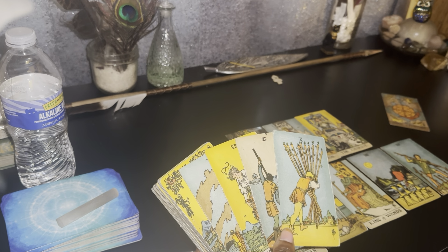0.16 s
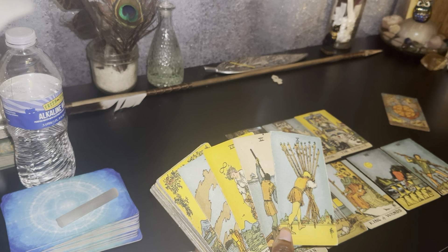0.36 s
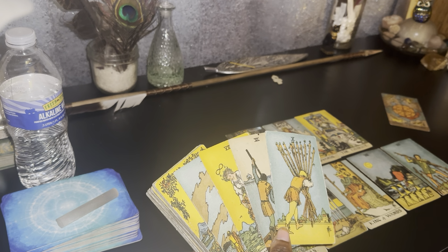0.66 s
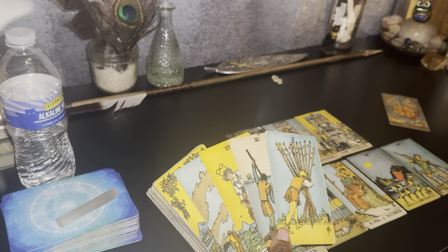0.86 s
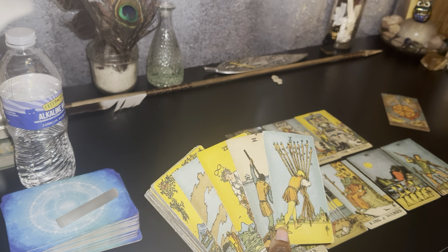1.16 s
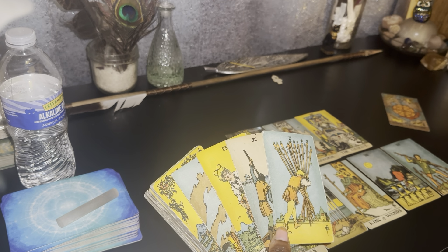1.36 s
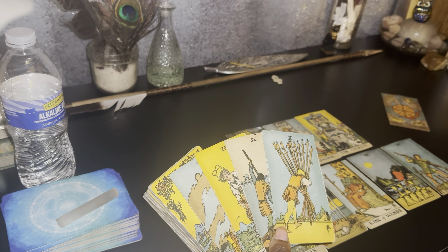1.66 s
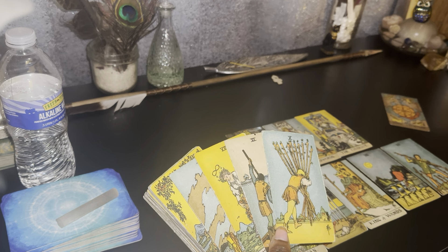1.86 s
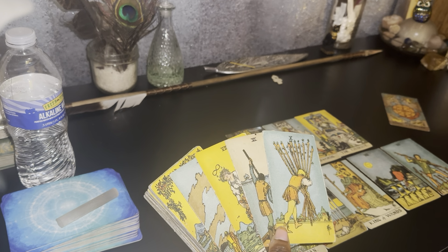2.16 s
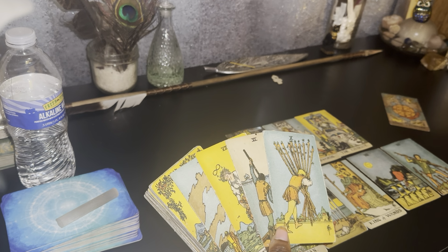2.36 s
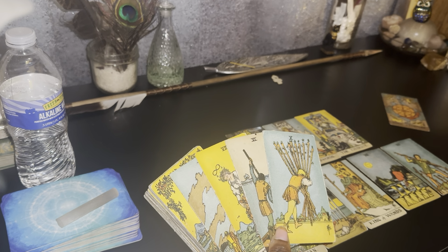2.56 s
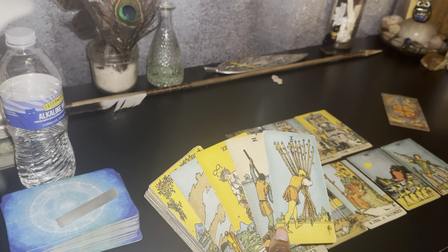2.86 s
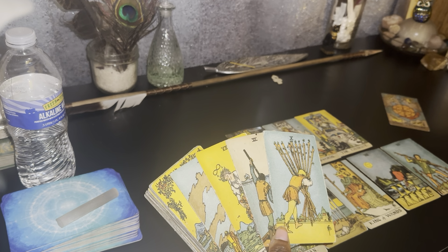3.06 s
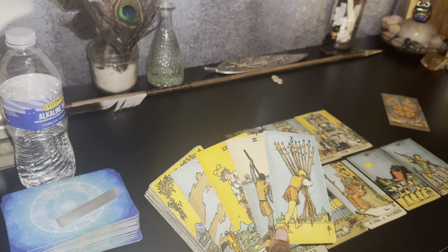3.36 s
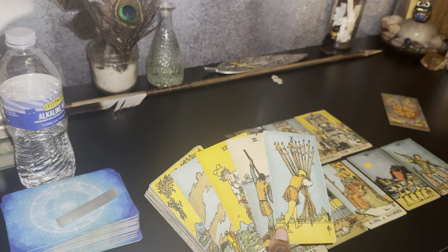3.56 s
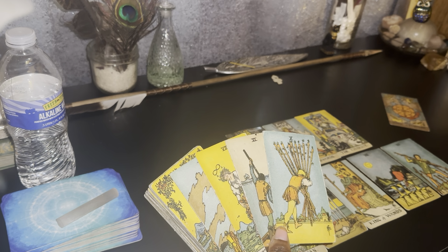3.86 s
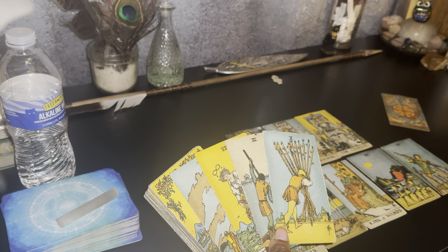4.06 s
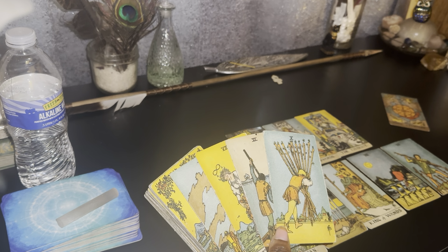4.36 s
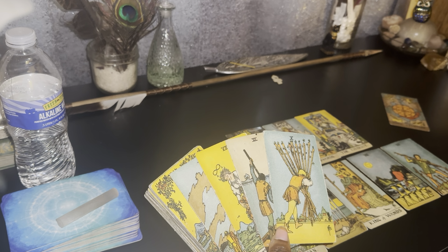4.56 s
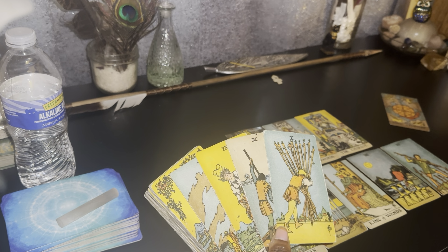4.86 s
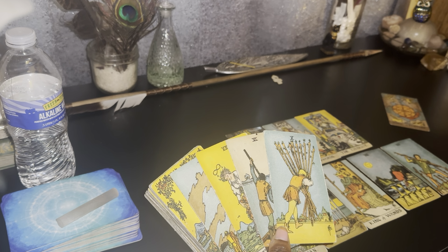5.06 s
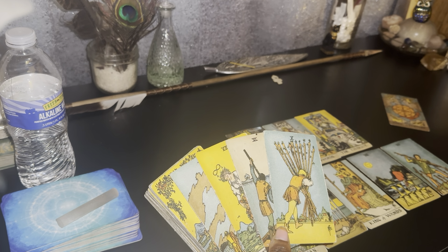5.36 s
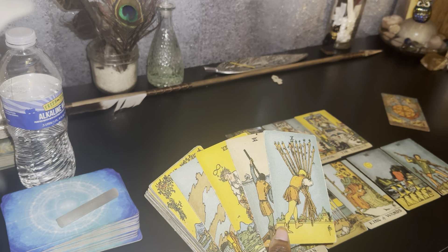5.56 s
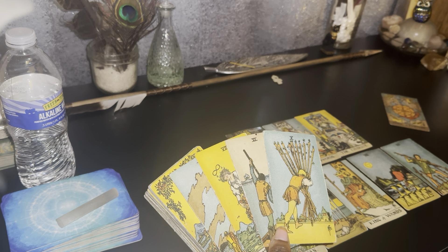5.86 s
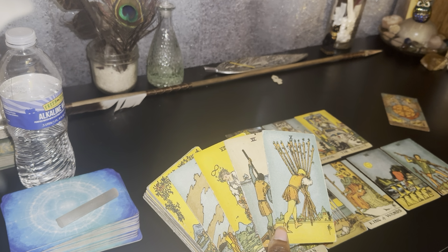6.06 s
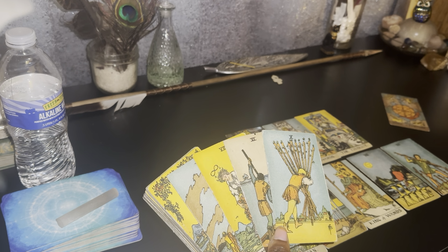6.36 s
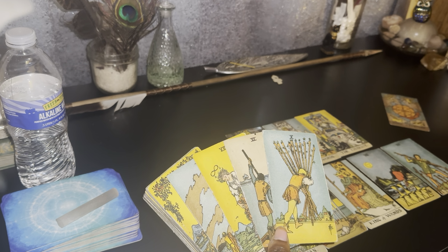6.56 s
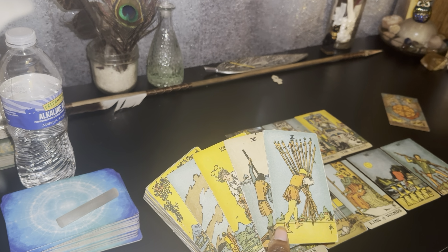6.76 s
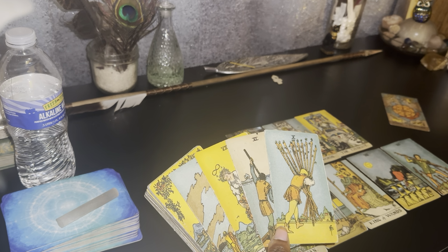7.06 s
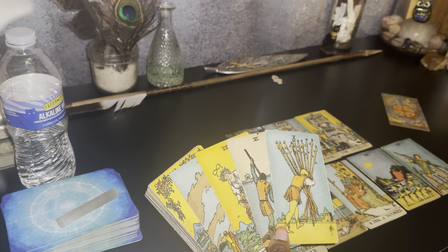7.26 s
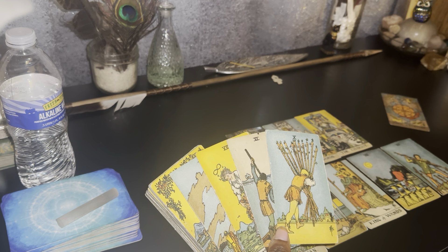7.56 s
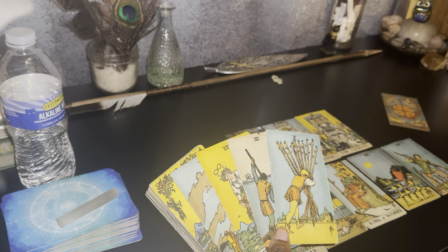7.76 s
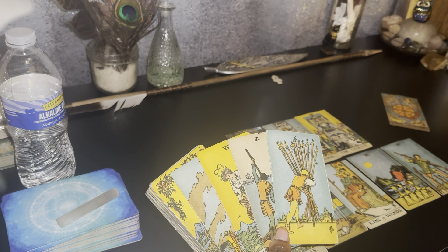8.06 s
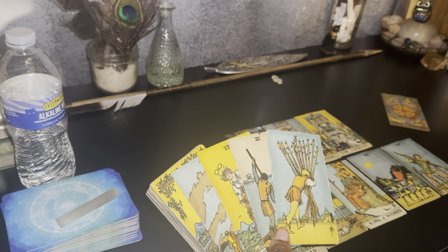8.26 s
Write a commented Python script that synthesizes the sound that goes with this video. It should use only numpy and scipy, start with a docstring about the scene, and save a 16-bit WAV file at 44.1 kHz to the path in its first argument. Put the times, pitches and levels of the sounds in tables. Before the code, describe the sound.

At a table in a closed room, a card makes two very soft, papery slides, followed by a small sharp tick and two faint, dull taps. After that there is only the background, present from the start: the muffled rumble of heavy rain outside, a low throbbing appliance hum that evens out late on, and a faint fan whirr. The microphone adds a light hiss on the left.

```python
"""A closed room in steady heavy rain. Throughout, drops drum through roof and walls as a muffled rumble,
an appliance's two motors beat at about 5 Hz, its fan whirrs and the left microphone channel hisses.
At the table a card slides at 0 and 0.2 s, something small and hard ticks at 0.37 s,
and two faint taps follow at 0.43 and 0.84 s. Near 7 s the faster motor dies away."""
import sys
import numpy as np
from scipy import signal
from scipy.fft import rfft, irfft
from scipy.io import wavfile

SR = 44100
rng = np.random.default_rng(int(sys.argv[2]) if len(sys.argv) > 2 else 0)


def wrap_up_sound(samples):
    """Save the sound to the file named by the first command line argument, as 16-bit audio."""
    columns = np.atleast_2d(samples).T
    # keep every value between -1 and 1, then stretch to whole-number steps
    tamed = np.clip(columns, -1, 1)
    steps = np.round(tamed * 32767).astype(np.int16)
    wavfile.write(sys.argv[1], SR, steps)


N = 371322
TIME = np.arange(N) / SR
FREQ = np.maximum(np.arange(N // 2 + 1) * SR / N, 1)

# modes of the ticking object: f/Hz, relative level/dB, t60/s
OBJECT_MODES = [(4700, -22, 0.0023), (7300, -17.5, 0.0038), (8300, -1, 0.0034), (9780, -19, 0.0035),
                (14500, -15, 0.0016)]


def undb(db):
    """Decibels to gain."""
    return 10 ** (np.asarray(db) / 20)


def over_freq(table, column=1):
    """A table column interpolated over log frequency."""
    rows = np.array(table, float)
    return np.interp(np.log(FREQ), np.log(rows[:, 0]), rows[:, column])


def bell(hz, width_hz):
    """Resonance hump of height 1; full width at half height."""
    return 2 ** -np.minimum((2 * (FREQ - hz) / width_hz) ** 2, 100)


def colour(x, gain):
    """Shape white noise of rms 1 to this amplitude per root Hz."""
    return irfft(rfft(x) * gain * np.sqrt(SR / 2), N)


def white():
    """Independent left and right noise."""
    return rng.standard_normal((2, N))


def unit_noise(gain):
    """Coloured stereo noise, rms 1."""
    x = colour(white(), gain)
    return x / x.std()


def partly_shared(share):
    """Stereo noise with this share of its power common to both sides."""
    return np.sqrt(share) * rng.standard_normal(N) + np.sqrt(1 - share) * white()


def walk(rate_hz):
    """Smooth random drift, standard deviation 1."""
    x = irfft(rfft(rng.standard_normal(N)) * bell(0, 2 * rate_hz + 2), N)
    return x / x.std()


def impacts(per_s, scatter_db):
    """Two trains of tiny random impacts of uneven size, rms 1."""
    hit = rng.random((2, N)) < per_s / SR
    x = hit * white() * undb(scatter_db * white())
    return x / x.std()


def pan(db):
    """Stereo gains for a left-minus-right level."""
    return undb(np.array([[1], [-1]]) * db / 2)


def left_delay(lag_s):
    """Stereo frequency response that delays the left channel."""
    return np.exp(-2j * np.pi * FREQ * lag_s * np.array([[1], [0]]))


def release(end_s, t60_s):
    """Full level until end_s, then exponential decay."""
    return np.exp(-np.log(1000) * np.maximum(TIME - end_s, 0) / t60_s)


def strike(start_s, t60_s, rise_s):
    """Envelope: quick rise, exponential decay."""
    age_s = np.maximum(TIME - start_s, 0)
    return (1 - np.exp(-(age_s / rise_s) ** 2)) * release(start_s, t60_s)


def object_colour():
    """The ticking object's modes smeared into a broad spectrum."""
    return sum(undb(db) * bell(hz, width_hz=2300) for hz, db, _ in OBJECT_MODES)


def hiss(right_db=-29):
    """Electronic noise: a floor on both channels, a strong treble band on the left."""
    # noise floor: f/Hz, density/(dB per Hz)
    floor_spectrum = [(1000, -126), (4500, -126), (7000, -128), (9000, -141), (11500, -143), (13200, -133),
                      (14600, -130.5), (15200, -133), (15700, -150)]
    # left-channel hiss: f/Hz, density/(dB per Hz)
    band_spectrum = [(3500, -135), (4700, -122), (5500, -108), (6150, -101), (7400, -101.5), (8000, -114),
                     (8800, -132), (9500, -150)]
    floor = colour(partly_shared(0.32), undb(over_freq(floor_spectrum)))
    band = colour(rng.standard_normal(N), undb(over_freq(band_spectrum)))
    return floor + band * undb([[0], [right_db]])


def hum_tone(hz, db, waver_db=1.85, drift_rad=0.2):
    """A tone wandering slightly in level and phase."""
    phase = 2 * np.pi * (hz * TIME + rng.random()) + drift_rad * walk(0.76)
    return np.sqrt(2) * undb(db + waver_db * walk(2.0)) * np.sin(phase)


def hum(slow_hz=54.02, fast_hz=59.17, in_step_s=0.193):
    """Two steady motors beat as they pass in and out of step, under a few higher tones."""
    # motor levels: t/s, slow/dB rms, fast/dB rms
    motor_levels = [(0, -52, -57.5), (1.5, -53.5, -59.5), (3.4, -53, -54.5), (4.4, -55, -62),
                    (5.8, -55, -61), (6.5, -56.5, -60), (7.2, -58.5, -75), (8.2, -54, -77)]
    # higher hum tones: f/Hz, level/dB rms
    tones = [(119.9, -65), (177.6, -76), (221.5, -68), (258.4, -62)]
    times_s, slow_db, fast_db = np.array(motor_levels).T
    start_cycles = rng.random()
    motors = 0
    for hz, db in [(slow_hz, slow_db), (fast_hz, fast_db)]:
        phase = 2 * np.pi * (hz * (TIME - in_step_s) + start_cycles)
        motors += np.sqrt(2) * undb(np.interp(TIME, times_s, db)) * np.sin(phase)
    return motors + sum(hum_tone(hz, db) for hz, db in tones)


def blades(hz=584, wander_hz=11, db=-71.5, side_db=-5):
    """The fan's blade tone wanders in pitch as the airflow loads it unevenly."""
    pitch_hz = hz + wander_hz * np.tanh(walk(3)) / np.tanh(1)
    amplitude = np.sqrt(2) * undb(db + 2.5 * walk(7))
    return amplitude * np.sin(2 * np.pi * np.cumsum(pitch_hz) / SR) * pan(side_db)


def fan(lag_s=0.00019):
    """Moving air rings the housing's narrow resonances around the blade tone, right of centre."""
    # housing resonances: f/Hz, width/Hz, left and right density between swells/(dB per Hz)
    housing_modes = [(526.6, 12, -91, -85), (545.8, 12, -84.5, -82.5), (576.7, 20, -86, -78.8),
                     (602.4, 17, -81.7, -81.7), (641, 11, -100.5, -89.3), (691, 47, -99, -104)]
    # swells of the whirr: crest t/s, width/s, lift/dB
    swells = [(0.972, 0.43, 4.5), (1.548, 0.43, 2), (2.112, 0.33, 3), (2.8, 0.29, 3.5), (4.127, 0.19, 4.5),
              (5.333, 0.15, 4), (5.83, 0.22, 2.5), (6.612, 0.071, 6.5), (6.97, 0.23, 3.5),
              (7.988, 0.085, 6), (8.202, 0.13, 3)]
    power = sum(bell(hz, width_hz) * undb([[left_db], [right_db]]) ** 2
                for hz, width_hz, left_db, right_db in housing_modes)
    whirr = colour(partly_shared(0.78), np.sqrt(power) * left_delay(lag_s))
    swell_db = sum(db * 2 ** -((2 * (TIME - crest_s) / width_s) ** 2) for crest_s, width_s, db in swells)
    return (whirr + blades()) * undb(swell_db)


def card_slides(attack_s=0.012, t60_s=0.94, rub_hz=4500, rub_width_hz=3200, rub_db=-1.8):
    """A card slides softly: tiny catches of its surface make a papery grain."""
    # strokes: start t/s, length/s, level/dB
    strokes = [(0, 0.1, -80), (.2, 0.06, -82.3)]
    envelope = 0
    for start_s, length_s, db in strokes:
        attack = np.clip((TIME - start_s) / attack_s, 0, 1)
        envelope += undb(db) * attack * release(start_s + length_s, t60_s)
    spectrum = np.sqrt(object_colour()) + undb(rub_db) * bell(rub_hz, rub_width_hz)
    grain = colour(impacts(per_s=2500, scatter_db=2.0), spectrum)
    return envelope * grain / grain.std()


def taps(side_db=4.0):
    """Two faint, dull taps excite the same body."""
    # broad body resonances: f/Hz, width/Hz, relative level/dB
    body_modes = [(1250, 1200, 5), (2600, 2000, -2.5), (6600, 1800, -5)]
    # taps: t/s, level/dB, t60/s
    hits = [(0.4262, -59, 0.029), (0.837, -68.5, .05)]
    body = sum(undb(db) * bell(hz, width_hz) for hz, width_hz, db in body_modes)
    envelope = sum(undb(db) * strike(start_s, t60_s, rise_s=0.0005) for start_s, db, t60_s in hits)
    return unit_noise(body) * pan(side_db) * envelope


def tick(room_db=-69, room_t60_s=0.18):
    """A small hard object ticks and rebounds twice, each rebound brighter; the room answers."""
    # contacts: t/s, peak before panning/dB, left minus right/dB, weak-mode lift/dB
    contacts = [(0.368, -46.5, 8, -2), (0.3714, -56, -1, 2), (0.3736, -52, 4, 9)]
    main_hz = max(OBJECT_MODES, key=lambda mode: mode[1])[0]
    direct = 0
    for start_s, peak_db, side_db, lift_db in contacts:
        ring = 0
        for hz, mode_db, t60_s in OBJECT_MODES:
            gain = undb(mode_db + lift_db * (hz != main_hz))
            envelope = strike(start_s, t60_s, rise_s=0.00033)
            ring += gain * envelope * np.sin(2 * np.pi * hz * (TIME - start_s))
        direct += ring / np.abs(ring).max() * undb(peak_db) * pan(side_db)
    room_decay = strike(contacts[0][0], room_t60_s, rise_s=0.002)
    return direct + undb(room_db) * unit_noise(object_colour()) * room_decay


def rain(waver_db=0.35):
    """Drops drum on the building; the walls block the treble and room modes colour the rest."""
    # rain through the walls: f/Hz, density/(dB per Hz)
    wall_spectrum = [(20, -114), (36, -80), (52, -77.5), (80, -70), (110, -75), (200, -79.5), (270, -81),
                     (360, -89.5), (500, -92.5), (760, -103), (1100, -105.2), (1500, -109.3),
                     (2300, -112.7), (3200, -118.3), (8000, -134), (12000, -152)]
    # room resonances: f/Hz, width/Hz, lift/dB
    room_modes = [(50, 6, 7.5), (134.65, 14.6, 9.5), (163, 17, 6.5), (232.7, 11, 8), (404.6, 9, 3),
                  (424.5, 11, 5), (478.4, 12, 4.5), (802, 18, 5.5), (860, 18, 3), (937, 20, 6.5),
                  (985, 16, 6.5), (1055.5, 18, 8), (1230, 30, 4), (1435, 31, 6), (1497, 30, 5.8),
                  (1888, 37, 4), (2140, 49, 2), (4220, 1500, 1.5)]
    # rain at the two microphones: f/Hz, correlation, left minus right/dB, left delay/s
    image = [(61.6, 0.98, 0.1, 0.000053), (156, 0.96, 0.2, 0.00017), (185, .76, -1, 0.000034),
             (253, 0.98, 0, 0), (367, .25, 2, 0), (590, 0.6, 1.5, 0.00035), (1180, 0.2, -1, 0.00036),
             (1916, 0.3, 4.5, 0.0012), (3576, 0.3, 6, 0), (5960, 0.2, 0, 0.00066)]
    # rumble strength: t/s, relative level/dB
    strength = [(0, 0.8), (1.0, 0.4), (1.6, -0.5), (2.2, 0.7), (3.0, -0.06), (3.9, -0.85), (4.6, -0.44),
                (6.2, -0.2), (7.0, -0.5), (8.4, 0.2)]
    drops = impacts(per_s=12000, scatter_db=1.5)
    level_db = np.interp(TIME, *np.array(strength).T) + waver_db * walk(6.7)
    common, apart = drops * undb(level_db)
    room_db = sum(db * bell(hz, width_hz) for hz, width_hz, db in room_modes)
    response = undb(over_freq(wall_spectrum) + room_db) * pan(over_freq(image, column=2))
    # long waves reach both microphones alike, short ones do not
    correlation = over_freq(image)
    mid = colour(common, response * np.sqrt((1 + correlation) / 2))
    side = colour(apart, response * np.sqrt((1 - correlation) / 2))
    stereo = mid + side * np.array([[1], [-1]])
    return irfft(rfft(stereo) * left_delay(over_freq(image, column=3)), N)


def scene():
    """Rain, appliance, hiss and the small sounds at the table."""
    return rain() + hum() + fan() + hiss() + tick() + card_slides() + taps()


def record(dry):
    """The recorder's steep 16 kHz low-pass."""
    return signal.sosfilt(signal.ellip(8, 0.2, 70, 16000, fs=SR, output="sos"), dry)


dry = scene()
out = record(dry)
wrap_up_sound(out)
```